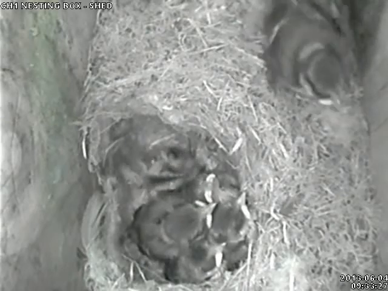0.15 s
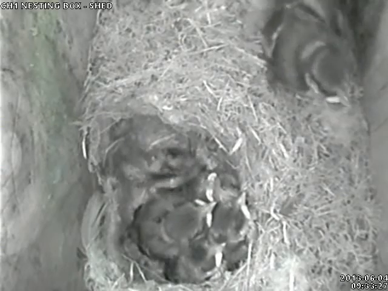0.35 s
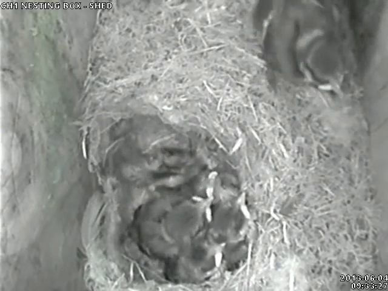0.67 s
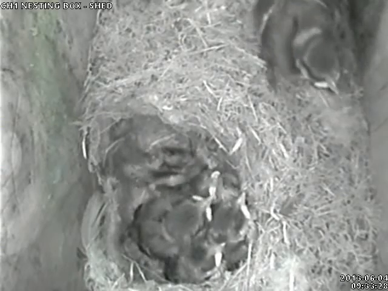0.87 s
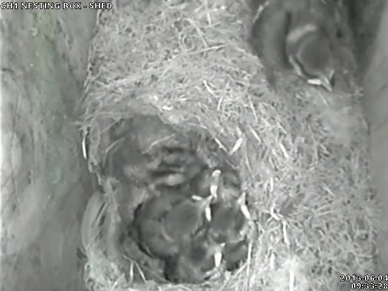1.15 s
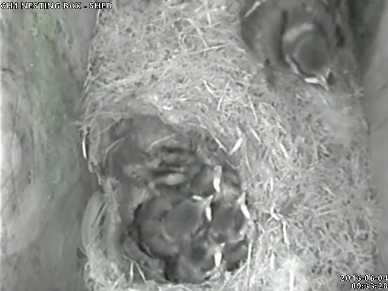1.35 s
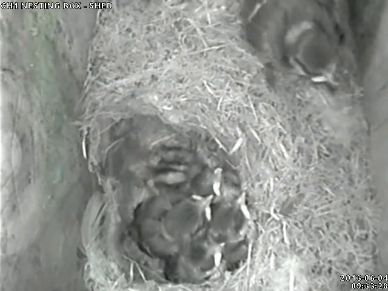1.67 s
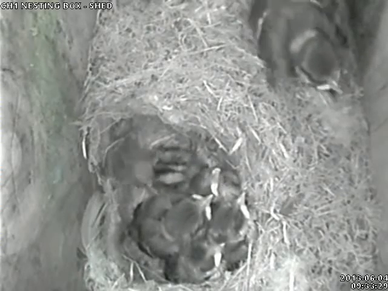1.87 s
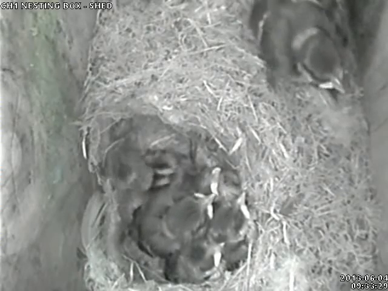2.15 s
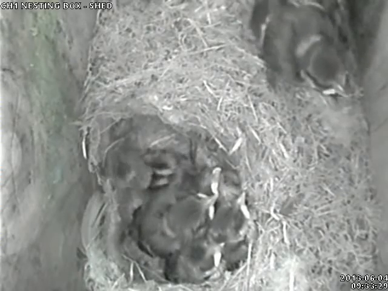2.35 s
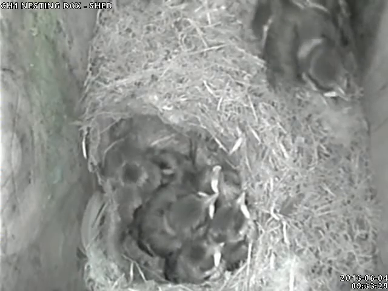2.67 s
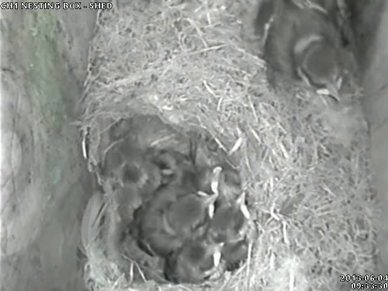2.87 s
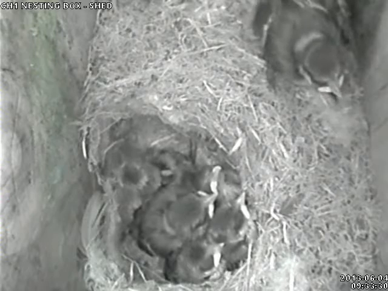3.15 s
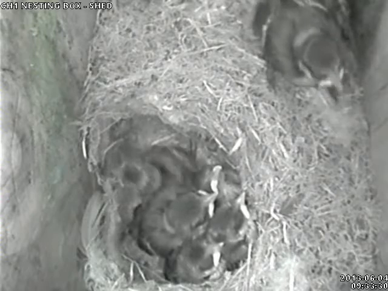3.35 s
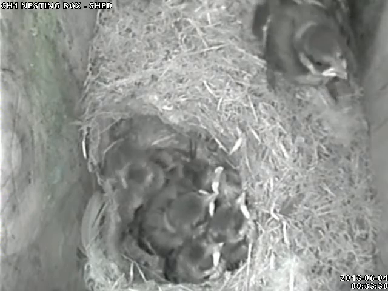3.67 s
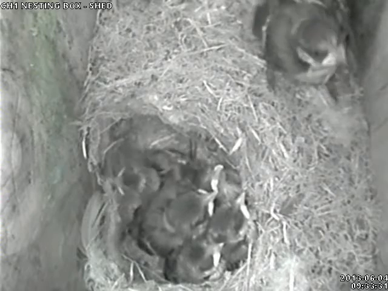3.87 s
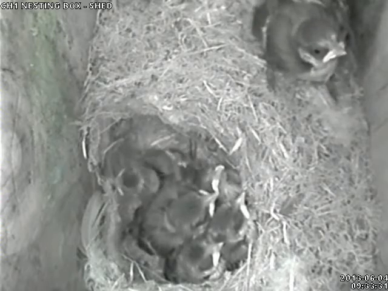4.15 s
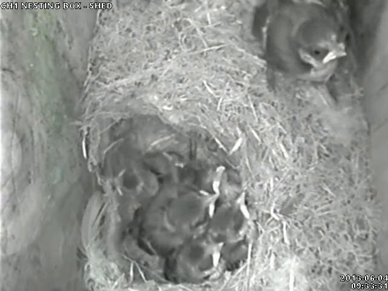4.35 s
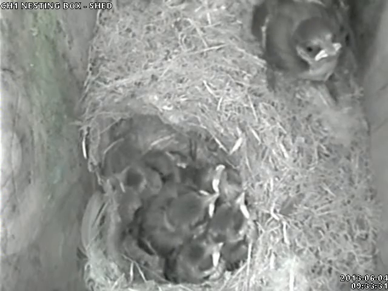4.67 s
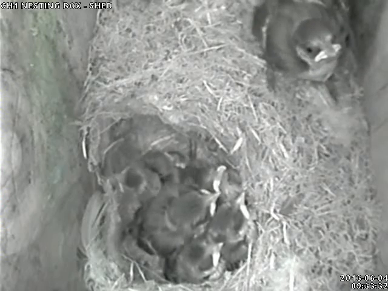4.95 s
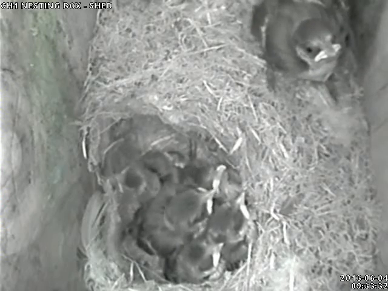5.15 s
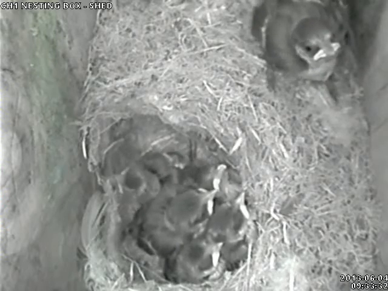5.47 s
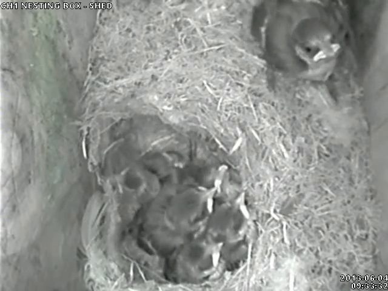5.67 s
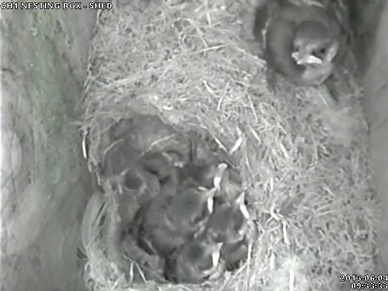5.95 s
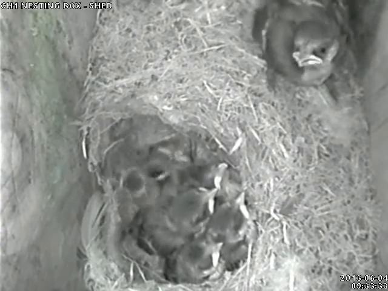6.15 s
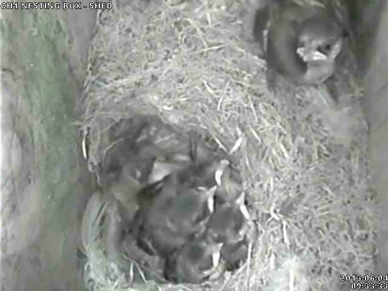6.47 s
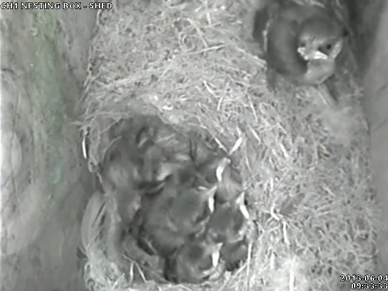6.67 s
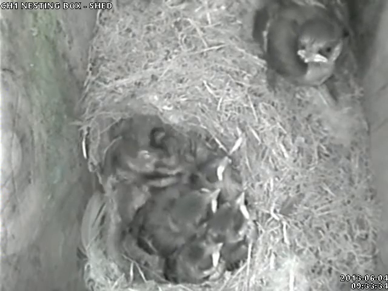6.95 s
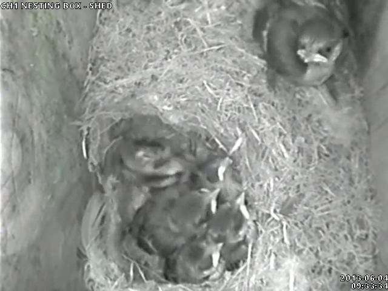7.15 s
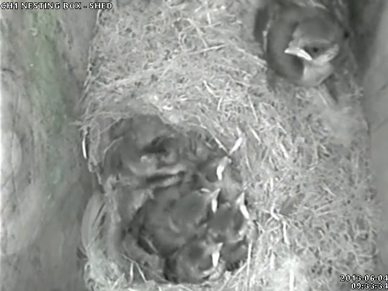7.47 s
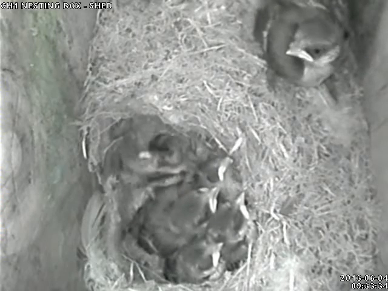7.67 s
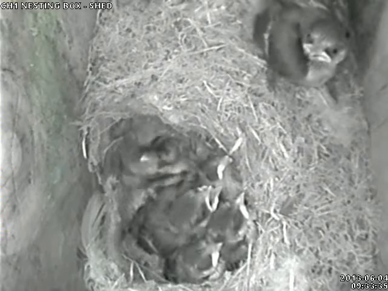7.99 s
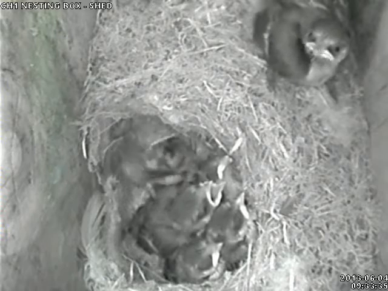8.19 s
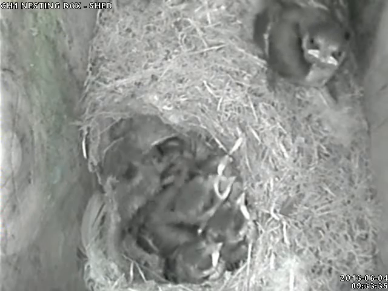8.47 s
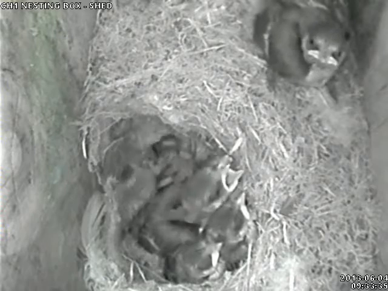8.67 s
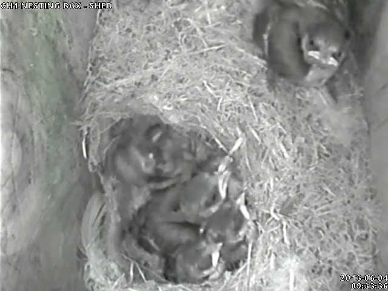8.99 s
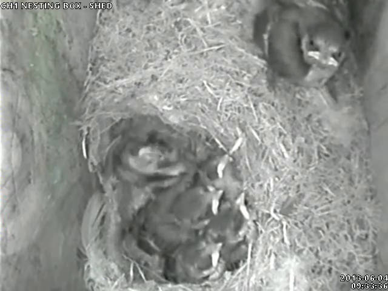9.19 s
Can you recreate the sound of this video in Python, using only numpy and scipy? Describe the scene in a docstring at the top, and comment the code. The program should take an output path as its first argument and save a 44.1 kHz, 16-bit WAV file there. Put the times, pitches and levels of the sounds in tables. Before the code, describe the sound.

Close, raspy chick begging calls and loud clear peeps come and go over electrical hiss and whine, while faint coos and twitters drift in later.

```python
"""Hiss, whine, mains hum and outdoor rumble run throughout, with air that rings a hollow wooden nest box.
From the start nestlings beg close to a small microphone: filtered noise and unstable tones make hoarse rasps,
and gliding tones of varying roughness make the thin whistles breaking out of them. Loud peeps join later.
A far pigeon's soft wavering coos come in near the middle, then a faint twitter of quick wavering glides."""
import sys
import numpy as np
from scipy import signal
from scipy.fft import rfft, irfft
from scipy.io import wavfile

SR = 44100
rng = np.random.default_rng(int(sys.argv[2]) if len(sys.argv) > 2 else 0)


def amplitude_ratio(level_db):
    """Convert a level in decibels to the matching linear amplitude (field) ratio."""
    exponent = np.asarray(level_db, float) / 20
    return 10 ** exponent


def dump_mix(stems):
    """Bounce the given channels to the path in sys.argv[1] as a 16-bit WAV at rate SR."""
    frames = np.atleast_2d(stems).T  # one column per channel
    limited = np.clip(frames, -1, 1)  # hard clip at full scale
    pcm = np.round(limited * 32767).astype(np.int16)
    wavfile.write(sys.argv[1], SR, pcm)


N = 411012
TIME = np.arange(N) / SR
HZ = np.fft.rfftfreq(N, 1 / SR)

# hoarse calls, levels before balance and flutter:
# start_s, length_s, box_boom_db, middle_throat_db, high_throat_db
RASP_CALLS = [(0.0, 0.063, -58.5, -65.5, -56), (0.148, 0.064, -55, -62, -60.5),
              (0.224, 0.038, -65.5, -78, -65), (0.31, 0.061, -52, -59, -50), (.441, 0.067, -52, -53.5, -54),
              (0.589, 0.086, -53.5, -55, -55.5), (.758, 0.013, -57.5, -63, -65),
              (.976, 0.0097, -60, -61, -72), (1.01, .02, -50.5, -45.5, -52), (1.062, 0.043, -60, -62, -56),
              (1.172, 0.063, -51.5, -49.5, -60), (1.443, 0.07, -51, -52.5, -65),
              (1.834, 0.039, -60.5, -58.5, -58.5), (2.008, 0.022, -61.5, -62, -54),
              (2.051, 0.012, -60, -70, -55), (2.23, 0.03, -58.5, -61, -54),
              (2.441, 0.036, -56.5, -56, -56.5), (2.62, .066, -50.5, -52, -58),
              (2.825, 0.083, -51.5, -55, -61.5), (3.063, 0.079, -53.5, -56, -57),
              (3.452, 0.055, -57.5, -66, -58), (3.632, 0.051, -53, -58.5, -51.5),
              (3.762, .052, -52, -56, -51.5), (3.898, 0.08, -51, -59, -56.5),
              (4.079, .044, -54, -55, -59.5), (4.251, 0.056, -52, -55, -58.5),
              (4.565, 0.0573, -53, -56, -67), (4.813, 0.067, -54, -54, -60),
              (5.437, 0.037, -56.5, -66, -56), (6.176, 0.044, -54.5, -52, -49),
              (6.315, 0.056, -52, -55, -48.5), (6.454, 0.045, -50, -49, -45.5),
              (6.609, 0.064, -49.5, -50.5, -47), (6.83, .058, -58, -56, -69), (7.126, 0.04, -56, -58, -66),
              (7.838, 0.052, -56.5, -61.5, -63), (8.013, .052, -51.5, -56, -49),
              (8.141, 0.056, -51, -55, -53.5), (8.289, 0.076, -52.5, -57, -52.5)]
# lower and upper resonances of the hollow box: centre_hz, width_hz, relative_db
BOX_MODES = [(848.7, 79, 6), (887, 292, -6.5)]
UPPER_BOX_MODES = [(1127, 114, -2.5), (1349, 133, -1), (1845, 770, -14.5)]

# strands that start above this pitch belong to the high side of the syrinx: clearer, with a slower fade-in
HIGH_SIDE_HZ = 6850


def unit(x):
    """Scale to rms 1."""
    return x / np.sqrt(np.mean(np.abs(x) ** 2))


def noise(gain):
    """White noise shaped by a gain at each frequency, rms 1."""
    return unit(irfft(rfft(rng.standard_normal(N)) * gain, N))


def colour(points):
    """Gain curve through (Hz, dB) points, straight in log frequency."""
    hz, db = np.transpose(points)
    return amplitude_ratio(np.interp(np.log(HZ + 1), np.log(hz), db))


def resonances(modes):
    """Gain of a set of steep-sided resonances, summed as power."""
    power = sum(amplitude_ratio(db) ** 2 / (1 + ((HZ - hz) / width) ** 2) ** 3 for hz, width, db in modes)
    return np.sqrt(power)


def wobble(rate_hz):
    """Smooth random motion, rms 1: noise that fades away above rate_hz."""
    return noise(np.exp(-(HZ / rate_hz) ** 2))


def gate(t, start, end, rise, fall):
    """Level ramps centred on start and end; all times in seconds."""
    opening = np.clip((t - start) / rise + 0.5, 0, 1)
    closing = np.clip((end - t) / fall + 0.5, 0, 1)
    return opening * closing


def electronics():
    """Smooth hiss, a grainy whine in evenly spaced humps, and wavering mains hum."""
    # hiss spectrum: frequency_hz, relative_db
    hiss_colour = [(200, 12.5), (700, 5.5), (1500, 0.5), (3000, -1), (6000, 0), (9000, -1), (13000, -5.5)]
    # humps of the whine: centre_hz, width_hz, relative_db
    whine_humps = [(4010, 440, -0.5), (7880, 600, 1), (11500, 1100, -5.5)]
    # mains harmonics: frequency_hz, level_db before wavering
    hum_partials = [(50, -70), (150, -70.5), (200, -74), (250, -76), (300, -78.5), (350, -81), (400, -87),
                    (450, -84.5)]
    hiss_db, whine_db = -63, -67.5  # the whine level is before its grain

    hiss = noise(colour(hiss_colour) * (HZ > 150))
    humps = sum(amplitude_ratio(db) * np.exp(-((HZ - hz) / width) ** 2) for hz, width, db in whine_humps)
    tick = 1 + 0.5 * np.exp(-(TIME * 100 % 1) / 0.057)  # 100 decaying ticks a second
    grain = amplitude_ratio(2.5 * wobble(250.0) + 1.2 * wobble(35.0))
    whine = tick * grain * noise(humps)
    hum = np.zeros(N)
    for hz, db in hum_partials:
        level = amplitude_ratio(db + 1.5 * wobble(6.0))
        hum += level * np.sqrt(2) * np.sin(2 * np.pi * hz * TIME + hz)  # the last hz only staggers phases
    return amplitude_ratio(hiss_db) * hiss + amplitude_ratio(whine_db) * whine + hum


def outdoors():
    """Low rumble, a deep throb of far traffic, and air noise that rings the box."""
    # rumble, throb and air over time: time_s, level_db (air before its wavering)
    rumble_levels = [(0.0, -60.5), (2.9, -61.5), (3.87, -59), (5.94, -62), (9.32, -56)]
    throb_levels = [(0.0, -65.5), (8.75, -73), (9.32, -74)]
    air_levels = [(0.0, -72), (0.36, -62.5), (0.75, -69.5), (3.06, -71.5), (6.88, -69.5), (7.58, -77.5),
                  (8.12, -70.5), (9.32, -73.5)]
    # rumble spectrum: frequency_hz, relative_db
    rumble_colour = [(15, -23), (25, -13), (33, -14), (59, -4), (81, -14.5), (130, -4.5), (205, -2),
                     (325, -18.5), (354, -16), (700, -36), (910, -58), (1540, -120)]

    rumble = amplitude_ratio(np.interp(TIME, *np.transpose(rumble_levels))) * noise(colour(rumble_colour))
    throb = amplitude_ratio(np.interp(TIME, *np.transpose(throb_levels))) * noise(resonances([(82.6, 24, 0)]))
    air_db = np.interp(TIME, *np.transpose(air_levels)) + 1.0 * wobble(5.9)
    air = amplitude_ratio(air_db) * noise(resonances(BOX_MODES + UPPER_BOX_MODES))
    return rumble + throb + air


def side_flutter():
    """Low noise that enters the two channels with opposite sign."""
    # flutter spectrum: frequency_hz, relative_db
    flutter_colour = [(12, -39), (20, 3), (32, -11.5), (69, -13.5), (199, -15.5), (256, -34.5), (350, -61),
                      (460, -91), (770, -120)]
    return amplitude_ratio(-71) * noise(colour(flutter_colour))


def warble(modes, rate_hz, share):
    """An unstable membrane whose pitch wanders and shivers among the resonances, mixed with breath."""
    hz = np.transpose(modes)[0]
    pitch = np.median(hz) + 380 * wobble(rate_hz) + 200 * wobble(6 * rate_hz)
    tone = np.sqrt(2) * np.sin(2 * np.pi * np.cumsum(pitch) / SR)
    breath = noise(np.abs(HZ - hz.mean()) < np.ptp(hz) + 500)
    mix = share * tone + np.sqrt(1 - share ** 2) * breath
    return unit(irfft(rfft(mix) * resonances(modes), N))


def rasps():
    """Chaotic membrane motion in uneven puffs, through throat and box; each call stops short."""
    # throat resonances and a breathy shoulder above the middle throat: centre_hz, width_hz, relative_db
    low_throat = [(3210, 1800, -7), (3787, 520, 5.5), (4050, 140, 4.5)]
    mid_throat = [(4500, 1300, -3), (4900, 63, -8)]
    high_throat = [(6150, 230, -3), (6600, 160, -5), (7050, 230, 0), (7600, 300, -5), (8700, 450, -12)]
    shoulder = [(5640, 250, 0)]
    # half-voiced puffs that mostly ring the box: start_s, box_boom_db before balance and flutter
    half_voiced = [(.816, -61), (1.681, -58.5), (1.96, -61), (7.56, -63), (7.776, -59.5), (8.788, -62.5),
                   (9.235, -62.5)]
    # how each part moves through a call; the high throat speaks first, the low throat ends last.
    # rows: box, upper box, low, middle and high throat, shoulder: lead_s, lag_s, swell_db
    part_shapes = [(.001, 0.0033, -1), (.001, 0.00069, 0), (.003, 0.0073, 5.5), (.003, .006, 5.5),
                   (.008, 0.0011, 3), (.003, .002, 0)]
    low_throat_db = -2.5  # in full calls, the low throat against the box boom
    puff_s, puff_throat_db = 0.016, -17.5  # puff length; its throat parts against the box boom
    shoulder_tilt, shoulder_open_db = 0.22, 7  # dB per dB; full once middle exceeds high by 7 dB

    parts = [noise(resonances(BOX_MODES)), noise(resonances(UPPER_BOX_MODES))]
    parts += [warble(modes, rate_hz=55.0, share=0.65) for modes in (low_throat, mid_throat, high_throat)]
    parts.append(noise(resonances(shoulder)))

    calls = [(s, length, db, db + low_throat_db, mid, high) for s, length, db, mid, high in RASP_CALLS]
    calls += [(s, puff_s, db) + (db + puff_throat_db,) * 3 for s, db in half_voiced]
    levels = np.zeros((len(parts), N))
    for s, length, box_db, low_db, mid_db, high_db in calls:
        cut = slice(max(int((s - 0.03) * SR), 0), int((s + length + 0.03) * SR))
        t = TIME[cut]
        # calls centred in the middle throat drive the upper box modes harder
        tilt_db = 0.19 * np.clip(mid_db - high_db, -12, 12)
        shoulder_db = mid_db + shoulder_tilt * min(mid_db - high_db - shoulder_open_db, 0)
        part_dbs = (box_db - 0.5 - tilt_db, box_db - 3.5 + tilt_db, low_db, mid_db, high_db, shoulder_db)
        for level, db, (lead, lag, swell_db) in zip(levels, part_dbs, part_shapes):
            swell = amplitude_ratio(db + swell_db * ((t - s) / length - 0.5))
            level[cut] += swell * gate(t, s - lead, s + length + lag, 0.014, 0.007)

    voice = sum(level * amplitude_ratio(2.2 * wobble(60.0)) * part for level, part in zip(levels, parts))
    uneven_puffs = amplitude_ratio(0.29 * wobble(110.0))
    return uneven_puffs * voice


def strands():
    """Nearly level tones of either side of the syrinx: low ones lift, high ones sink, all drift at random."""
    # start_s, length_s, pitch_hz, level_db
    strand_notes = [(0.018, 0.02, 3600, -52), (0.041, 0.025, 3380, -52.5), (.025, 0.029, 7140, -51),
                    (0.169, 0.036, 4010, -46), (0.174, 0.042, 6150, -50), (0.314, 0.032, 4050, -53),
                    (.32, 0.028, 7080, -47), (0.454, 0.027, 6860, -44), (0.475, 0.022, 6370, -45.5),
                    (0.613, .034, 4150, -47), (.617, 0.036, 6500, -49), (.618, 0.047, 3350, -52),
                    (0.731, 0.035, 7100, -50), (0.764, 0.016, 5340, -37.5), (0.988, 0.022, 7100, -42.5),
                    (1.011, 0.024, 4910, -41), (1.161, 0.029, 7240, -50.5), (1.43, .037, 7200, -48.5),
                    (1.84, 0.041, 6220, -55), (2.023, 0.029, 7060, -46.5), (2.03, 0.017, 6360, -49),
                    (2.031, .024, 3350, -54.5), (2.228, .038, 3670, -58), (2.254, 0.015, 6230, -50.5),
                    (2.447, .023, 7600, -51.5), (2.62, .028, 7300, -49.5), (2.822, .023, 7180, -49.5),
                    (3.075, 0.015, 6240, -49), (3.082, 0.026, 7140, -47.5), (3.466, .032, 6300, -54.5),
                    (3.479, 0.024, 7300, -48.5), (3.48, 0.021, 3296, -57.5), (3.639, 0.038, 6140, -47.5),
                    (3.642, 0.033, 3870, -48.5), (3.775, 0.0284, 6040, -47), (3.77, .026, 6970, -51),
                    (3.782, .022, 3980, -48.5), (3.9, 0.018, 5180, -45.5), (3.919, 0.037, 7080, -48.5),
                    (3.923, 0.031, 4500, -50), (3.926, 0.047, 6190, -48.5), (4.131, 0.036, 6270, -59.5),
                    (4.54, 0.039, 7150, -52.5), (4.59, 0.042, 3980, -43.5), (4.822, 0.026, 7220, -53.5),
                    (4.827, 0.028, 3680, -56), (5.442, .024, 7030, -53), (5.447, 0.015, 4400, -54),
                    (6.348, 0.019, 4350, -45), (6.617, 0.032, 6930, -42.5), (6.637, 0.024, 4440, -44.5),
                    (6.825, 0.021, 7100, -51.5), (7.089, 0.034, 7070, -53.5), (7.855, .032, 7470, -46.5),
                    (7.858, 0.033, 3630, -62), (7.865, 0.029, 6600, -52), (8.026, .017, 6990, -55),
                    (8.034, .03, 4180, -47.5), (8.151, 0.028, 6750, -42.5), (8.178, 0.021, 4660, -42.5),
                    (8.294, .043, 6900, -47.5), (8.33, 0.031, 3530, -52.5)]
    lift_share, high_sag, drift_share = 0.011, 0.0038, 0.0084  # shares of the pitch, either way from it
    hoarse_spread = 0.21
    out = []
    for s, length, hz, db in strand_notes:
        drift, rough = rng.standard_normal(2)
        lift = -high_sag if hz > HIGH_SIDE_HZ else lift_share
        bend = lift + drift_share * drift
        hoarse = max(hoarseness(hz) + hoarse_spread * rough, 0)
        out.append((s, length, hz * (1 - bend), hz * (1 + bend), db, hoarse))
    return out


def hoarseness(hz):
    """Roughest in the middle of the range, clearer on the high side, nearly pure at the bottom."""
    if hz < 3420:
        return 0.15
    return 0.52 if hz > HIGH_SIDE_HZ else 0.85


def falls():
    """Short drops in pitch as the breath runs out; low ones drop by a larger share."""
    # start_s, start_hz, level_db
    fall_notes = [(.343, 4150, -39.5), (0.348, 3500, -52), (.485, 4130, -40), (.646, 6500, -46.5),
                  (0.647, 4260, -47), (.666, 3400, -55), (1.029, 4100, -41.5), (1.11, 3430, -57),
                  (1.237, 4000, -44), (1.507, 4150, -39), (1.876, 3750, -54), (2.056, 3600, -57),
                  (2.251, 7250, -56), (2.262, 3850, -54), (2.466, 5100, -45.5), (2.69, 4100, -45.5),
                  (2.907, 4030, -45.5), (3.503, 3550, -58), (3.96, 4520, -45), (3.968, 3500, -58),
                  (5.464, 3600, -55), (6.208, 4300, -51), (7.883, 7450, -48.5), (7.891, 3900, -55),
                  (8.342, 4720, -41)]
    length, hoarse = 0.015, 0.45  # length in s
    out = []
    for s, hz, db in fall_notes:
        drop = 0.075 if hz < 3950 else 0.047  # share of the pitch
        out.append((s, length, hz, hz * (1 - drop), db, hoarse))
    return out


def flicks():
    """Wide slides: sags inside a call and upward flicks at its end."""
    # start_s, length_s, start_hz, end_hz, level_db
    flick_notes = [(1.176, 0.029, 5150, 4300, -44.5), (1.209, 0.01, 4330, 4800, -40),
                   (1.217, 0.023, 4740, 4980, -36), (1.448, .014, 5210, 4750, -47),
                   (1.461, 0.021, 4700, 4550, -41), (1.479, 0.048, 4900, 4800, -37.5),
                   (2.462, 0.014, 5000, 5700, -40.5), (2.647, 0.02, 4700, 4400, -50),
                   (2.675, .012, 4500, 5100, -40.5), (2.689, 0.0094, 5120, 4740, -43),
                   (3.673, 0.0099, 4050, 4500, -48), (3.8, .015, 3840, 6660, -39.5),
                   (3.802, 0.014, 5700, 7530, -45), (6.491, 0.015, 4200, 5750, -40.5),
                   (6.499, 0.012, 5940, 7520, -41.5), (6.665, 0.01034, 4300, 4860, -40.5),
                   (6.673, 0.014, 6250, 7000, -52), (8.182, 0.019, 4000, 5420, -47)]
    return [row + (0.6,) for row in flick_notes]  # adds the hoarseness


def peep(s, length, hz, db, hoarse):
    """One peep slides down into its note, climbs while the rasp lasts, clears and holds, then droops shut."""
    entry_s, entry_hz, entry_db, entry_hoarse = 0.011, 350, -6.5, 0.76
    climb_hz, clear_hoarse = 145, 0.22
    droop_s, droop_hz, droop_db = 0.007, 130, -0.5
    rasp_end = max(start + lasts for start, lasts, *_ in RASP_CALLS if start < s + length)
    climb, droop = s + entry_s, s + length - droop_s
    hold = np.clip(rasp_end, climb + 0.005, droop - 0.002)
    top = hz + climb_hz
    return [(s, entry_s, hz + entry_hz, hz, db + entry_db, entry_hoarse),
            (climb, hold - climb, hz, top, db, hoarse),
            (hold, droop - hold, top, top, db, clear_hoarse),
            (droop, droop_s, top, top - droop_hz, db + droop_db, clear_hoarse)]


def strokes():
    """All whistled strokes in order: start_s, length_s, start_hz, end_hz, level_db, hoarseness."""
    # loud peeps: start_s, length_s, pitch_hz, level_db, hoarseness of the climb (scaled in whistles)
    peep_notes = [(2.617, 0.0392, 4760, -44, 1.04), (2.83, 0.085, 4750, -40.5, 1.04),
                  (3.094, 0.083, 4906, -39, 0.99), (4.077, 0.043, 4800, -37, 0.74),
                  (4.255, 0.073, 4795, -36, 0.5), (4.562, 0.06, 4815, -38, 1.07),
                  (4.839, 0.062, 4850, -36.5, 0.42), (6.847, 0.07, 4794, -34.5, 0.42),
                  (7.123, 0.074, 4810, -34.5, .5)]
    peeps = [stroke for row in peep_notes for stroke in peep(*row)]
    return sorted(peeps + strands() + falls() + flicks())


def phrases():
    """Strokes that start where another ends, in time and pitch, belong to one unbroken tone."""
    chains = []
    for note in strokes():
        for chain in chains:
            s, length, _, end_hz, *_ = chain[-1]
            if abs(s + length - note[0]) < 0.007 and abs(end_hz - note[2]) < 350:
                chain.append(note)
                break
        else:
            chains.append([note])
    return chains


def whistles():
    """Gliding tones; hoarseness trades the steady tone for a fluttering, broken one."""
    flutter = unit(wobble(250.0) + 1j * wobble(520.0))
    zigzag = wobble(120.0)
    out = np.zeros(N)
    for k, chain in enumerate(phrases()):
        s, length, hz0, hz1, db, hoarse = np.transpose(chain)
        start, end = s[0], s[-1] + length[-1]
        cut = slice(max(int((start - 0.01) * SR), 0), int((end + 0.01) * SR))
        t = TIME[cut]
        # each stroke has two knots, just inside its ends; pitch, level and hoarseness run between them
        knots = np.sort(np.ravel([s + 0.1 * length, s + 0.9 * length], "F"))
        share = np.clip(0.71 * np.interp(t, knots, np.repeat(hoarse, 2)), 0, 1)
        glide = np.interp(t, knots, np.ravel([hz0, hz1], "F"))
        # a hoarse tone also zigzags in pitch; each tone takes its own stretch of the random motion
        hz = glide + 90 * share * np.roll(zigzag, 4000 * k)[cut]
        shake = np.sqrt(1 - share ** 2) + share * np.roll(flutter, 4000 * k)[cut]
        tone = np.sqrt(2) * np.real(shake * np.exp(2j * np.pi * np.cumsum(hz) / SR))
        rise = 0.026 if hz0[0] > HIGH_SIDE_HZ else 0.006
        level = amplitude_ratio(np.interp(t, knots, np.repeat(db, 2)))
        out[cut] += level * gate(t, start, end, rise, 0.004) * tone
    return out


def nestlings():
    """Rasps and whistles together; the box cancels sound between its resonances."""
    # cancelled bands: centre_hz, width_hz, depth_db
    box_dips = [(5560, 200, -10), (2650, 300, -5)]
    dips_db = sum(db * np.exp(-((HZ - hz) / width) ** 2) for hz, width, db in box_dips)
    return irfft(rfft(rasps() + whistles()) * amplitude_ratio(dips_db), N)


def glides(table, waver_hz, depth_hz, flicker_db, edge):
    """Soft gliding sines whose pitch wavers more along each note while the level flickers; edge in s."""
    out = np.zeros(N)
    flicker = amplitude_ratio(flicker_db * wobble(waver_hz))
    for s, length, hz0, hz1, db in table:
        along = np.clip((TIME - s) / length, 0, 1)
        waver = depth_hz * along * np.sin(2 * np.pi * waver_hz * (TIME - s))
        hz = hz0 + (hz1 - hz0) * along + waver
        tone = np.sqrt(2) * np.sin(2 * np.pi * np.cumsum(hz) / SR)
        out += amplitude_ratio(db) * gate(TIME, s, s + length, edge, edge) * tone
    return out * flicker


def pigeon():
    """Far coos: low, soft-edged glides with a slight slow waver."""
    # start_s, length_s, start_hz, end_hz (before waver), level_db (before flicker)
    coos = [(4.17, 0.11, 450, 501, -72), (4.55, 0.12, 490, 457.4, -68.5), (4.68, 0.052, 390, 362, -67),
            (5.13, 0.14, 480, 454, -69.5), (5.4, 0.26, 465, 432, -69.5), (5.68, 0.086, 390, 360, -66),
            (6.72, 0.061, 445, 480, -67), (7.45, 0.14, 480, 434, -67.5), (7.6, 0.09, 400, 348, -68.5),
            (8.06, 0.14, 480, 440, -66.5), (8.38, .22, 455, 446, -69.5), (8.66, 0.089, 410, 348, -68.5)]
    return glides(coos, waver_hz=9.0, depth_hz=4.0, flicker_db=1.0, edge=0.06)


def twitter():
    """Faint high glides with a fast, wide waver and strong flicker."""
    # start_s, length_s, start_hz, end_hz (before waver), level_db (before flicker)
    chirps = [(5.745, .025, 6500, 6600, -75), (7.785, 0.022, 6950, 6560, -67),
              (8.07, 0.0333, 7150, 6690, -62), (8.228, 0.046, 6300, 6850, -64),
              (8.505, 0.14, 6480, 7300, -65.5), (8.805, 0.11, 6600, 6900, -65.5),
              (9.095, 0.092, 6360, 7100, -68)]
    return glides(chirps, waver_hz=42.0, depth_hz=300.0, flicker_db=5.0, edge=0.012)


def scene():
    """One microphone feeds both channels; only the low flutter differs between them."""
    mid = electronics() + outdoors() + nestlings() + pigeon() + twitter()
    side = side_flutter()
    return np.array([mid + side, mid - side])


def roll_off(x):
    """The treble ends steeply here."""
    return signal.sosfilt(signal.butter(12, 13360, fs=SR, output="sos"), x)


def record(dry):
    """The top is cut above 12850 Hz and the converter adds a steady offset to each channel."""
    # converter offset, one value a channel: offset [share of full scale]
    dc_offset = [.01575, .0132]
    cut = irfft(rfft(dry) * (HZ < 12850), N)
    mix = cut + np.array(dc_offset)[:, None]
    return roll_off(mix)


dry = scene()
out = record(dry)
dump_mix(out)
```